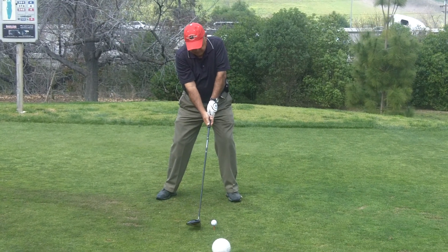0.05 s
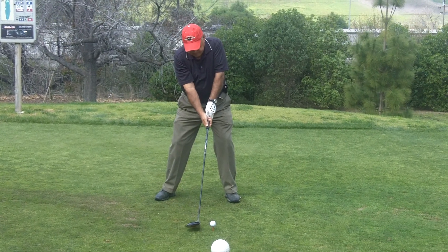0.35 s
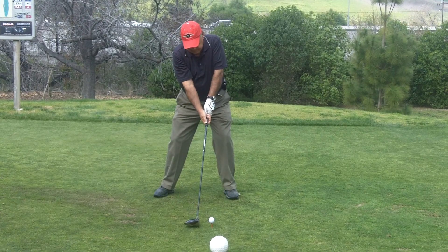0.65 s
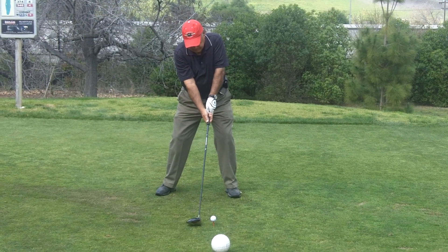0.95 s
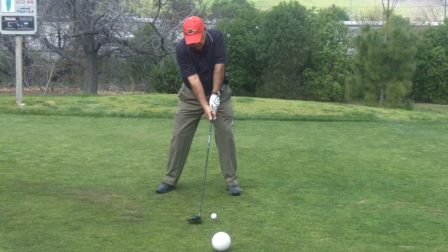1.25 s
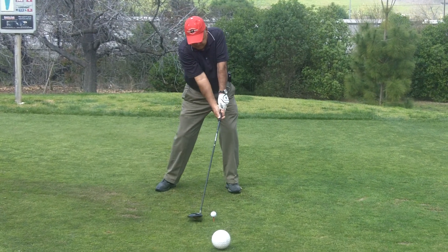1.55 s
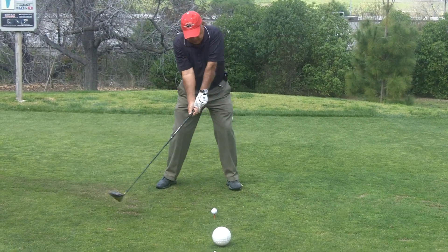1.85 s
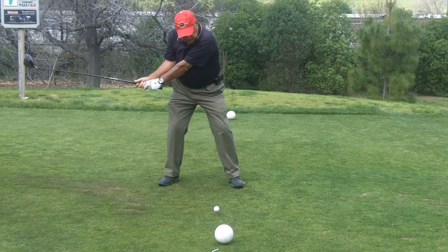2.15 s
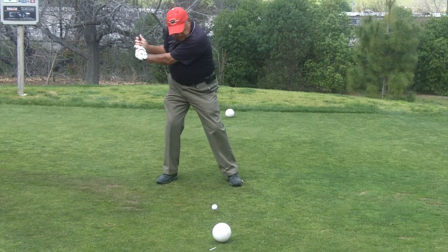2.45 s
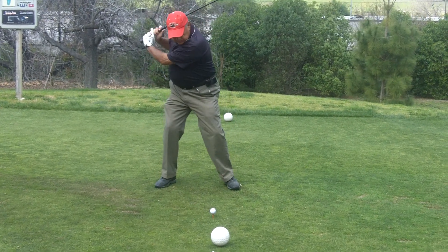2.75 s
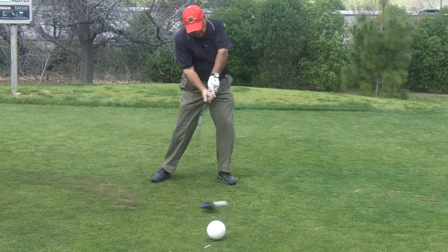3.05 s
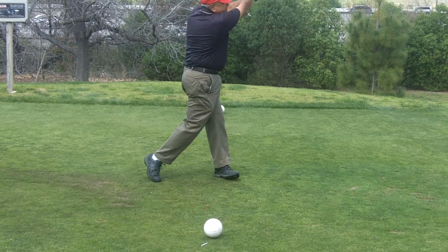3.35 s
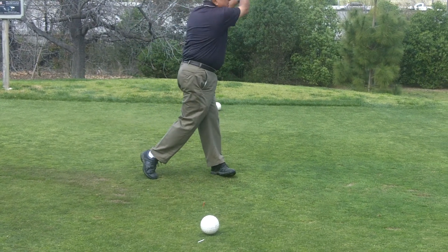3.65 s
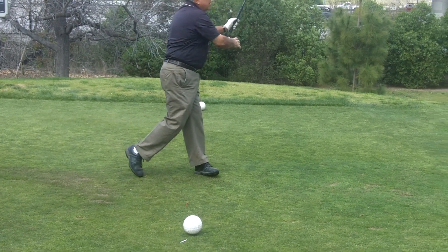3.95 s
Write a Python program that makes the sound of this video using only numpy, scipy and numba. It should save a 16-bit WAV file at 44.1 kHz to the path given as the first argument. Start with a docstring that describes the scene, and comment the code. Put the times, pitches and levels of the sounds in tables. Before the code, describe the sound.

A golf club hits a ball with a sharp metallic crack over distant traffic.

```python
"""A golf drive near a road. Engines and tyres hum throughout, under a faint hiss and whine.
A far-off hoot sounds at 1.2 s, then a small bird chirps twice. At 3.2 s the club swishes and cracks
against the ball; its hollow metal head rings, falling in pitch as it swings away. The crack overloads
the sound, so an automatic volume control turns everything down. The trees send the ring back,
and the background slowly returns."""
import sys
import numpy as np
from scipy import signal
from scipy.fft import rfft, irfft
from scipy.io import wavfile
from scipy.ndimage import uniform_filter1d
from numba import njit

SR = 44100
rng = np.random.default_rng(int(sys.argv[2]) if len(sys.argv) > 2 else 0)


def int16_out(signal):
    """Quantize to a 16-bit WAV file."""
    q = np.round(np.clip(np.atleast_2d(signal).T, -1, 1) * 32767)
    wavfile.write(sys.argv[1], SR, q.astype(np.int16))


N = 176400

# Tone colour of five noises: how strong each pitch is (frequency [Hz], relative level [dB])
HISS_COLOUR = [(3000, -5.5), (4000, -5), (5000, -3.5), (6100, 2), (7200, -7), (8300, -16), (9300, -23.5),
               (11000, -32), (12800, -34), (14500, -50)]
RUMBLE_COLOUR = [(12, -4), (22, 1.5), (40, -2), (53, -6), (72, -4.5), (100, -8), (145, -13), (200, -16),
                 (260, -22.5), (320, -24), (400, -32)]
TYRE_COLOUR = [(240, -45), (400, -13.5), (465, -6), (600, 0), (1030, -1), (1840, -7), (2860, -19.5),
               (3800, -34.5), (4940, -65), (8360, -120)]
RASP_COLOUR = [(4500, 1), (5500, 1), (8200, -1), (10000, -19), (12800, -20), (14000, -30)]
CRACK_COLOUR = [(200, -21), (600, -2), (1500, -3), (2500, -9), (4700, -15), (6400, 5), (7600, -5.5),
                (9500, -8), (13000, -20), (16000, -27)]
# Flow of the traffic (time [s], tyre level change [dB], engine level [dB])
TRAFFIC_FLOW = [(0, -0.3, -33.5), (.4, -0.8, -33.5), (.8, 0.7, -32.5), (1.25, 1.26, -29),
                (1.7, 0.94, -28.5), (2.1, 0, -27.5), (2.5, 1.2, -28.5), (2.9, 1.4, -27), (3.2, -0.2, -25),
                (3.6, -2.5, -25), (4, 0.8, -26)]
# The two chirps (start [s], full length [s], base level [dB], pitch [ratio],
# upper voice's level change over the length [dB], part sung [0-1], rasp time [s], relative rasp [dB])
CHIRPS = [(1.554, .104, -40, 1, 2, 1, 1.556, -13), (1.722, .106, -42, .985, -14, .86, 1.736, -9)]
# Course of one chirp (progress [0-1], pitch [Hz], level change [dB], roughness [0-1], lower voice [dB])
CHIRP_SHAPE = [(0, 5000, -2, 1, -25), (.13, 6080, 3, 0.54, -22), (.36, 7700, 0, .25, -8),
               (.6, 8420, -3, .22, -2.5), (.77, 8330, -1.5, .3, -2.5), (.87, 6950, -2, .55, -20),
               (1, 6250, -7, .5, -25)]
# Pitches that ring in the echo from the trees (delay [s], rise time [s], level [dB], pitch [Hz])
ECHO_RINGS = [(.155, .034, -38.5, 6220), (.115, .024, -47, 7950), (.13, .036, -57, 9150)]
# Dull knock of the ball (pitch [Hz], level [dB], time to fade by 60 dB [s])
BALL_TONES = [(640, -2, .016), (1000, -3, .01), (1320, -1, .01)]
# Natural tones of the club head; the close pair near 5800 Hz makes a quick wobble
# (pitch [Hz], relative level [dB], time to fade by 60 dB [s])
HEAD_TONES = [(3200, -14, .075), (4040, -20, .03), (5270, -14, .035), (5760, -5, .09), (5850, -1.5, .085),
              (6250, 1, .02), (6480, 1, .036), (6780, 1, .018), (7280, -12, .045), (7800, -14, .045),
              (8950, -14, .045), (9620, -3.5, .02), (11200, -14, .026), (12050, -13, .018)]

STRIKE_S = 3.2398  # the moment the club meets the ball


def gain(db):
    """Turn decibels into a number to multiply by."""
    return 10 ** (np.asarray(db) / 20)


def unit_level(x):
    """Scale a signal so that its average strength (rms) is 1."""
    return x / np.sqrt(np.mean(x ** 2))


def noise(colour, edge_db=40):
    """Noise with a given tone colour, falling by edge_db per octave beyond its ends."""
    hz, db = np.array(colour, float).T
    octave = np.log2(np.maximum(np.fft.rfftfreq(N, 1 / SR), 1))
    points = np.log2(hz)
    outside = abs(octave - np.clip(octave, points[0], points[-1]))
    shape = gain(np.interp(octave, points, db) - edge_db * outside)
    return unit_level(irfft(rfft(rng.standard_normal(N)) * shape, N))


def wobble(rate):
    """A smooth random curve of typical size 1 that changes about rate times a second."""
    hold = max(int(SR / rate), 1)
    steps = rng.standard_normal(N)[np.arange(N) // hold]
    return unit_level(uniform_filter1d(uniform_filter1d(steps, hold), hold))


def sine(hz):
    """A tone that follows a pitch curve."""
    return np.sin(2 * np.pi * np.cumsum(hz) / SR)


def fade(t, seconds):
    """Die away by 60 dB in the given time."""
    return np.exp(-np.log(1000) * t / seconds)


def ring(t, tones):
    """A struck object vibrates at several pitches, each fading at its own speed."""
    return sum(gain(db) * fade(t, seconds) * np.sin(2 * np.pi * hz * t) for hz, db, seconds in tones)


def scatter(x, strength):
    """Many tiny echoes that follow a strength curve, keeping about the same energy."""
    echoes = rng.standard_normal(N) * strength
    return signal.fftconvolve(x, echoes / np.sqrt(np.sum(echoes ** 2)))[:N]


def delay(x, seconds):
    """Start a sound later."""
    return np.concatenate([np.zeros(int(seconds * SR)), x])[:N]


def hiss_and_whine(t):
    """A steady hiss and a very faint, high tone."""
    return gain(-47.5) * noise(HISS_COLOUR) + gain(-88.5) * np.sin(2 * np.pi * 12780 * t)


def road(t):
    """Distant traffic: a low rumble, the wash of tyres, two engine notes and one brief hoot."""
    when, tyre_db, engine_db = np.array(TRAFFIC_FLOW).T
    rumble = noise(RUMBLE_COLOUR) * gain(-22.7 + .92 * wobble(5))
    tyres = noise(TYRE_COLOUR) * gain(-27 + np.interp(t, when, tyre_db) + .51 * wobble(11.87))
    drone_db = np.interp(t, when, engine_db)
    engines = sum(sine(hz + 3 * wobble(20)) * gain(drone_db + db + 2.4 * wobble(9))
                  for hz, db in [(70.46, 0), (172.1, -12)])
    hoot_swell = np.exp(-((t - 1.245) / .037) ** 2)
    hoot = sine(604 * (1 + .0212 * wobble(79.7))) * gain(-24.5) * hoot_swell
    return rumble + tyres + engines + hoot


def bird(t):
    """Two rough, two-voiced chirps echo in the bushes: one rises and falls, one breaks off early."""
    points, pitch, shape_db, roughness, lower_db = np.array(CHIRP_SHAPE).T
    song = np.zeros(N)
    for start, length, db, ratio, slope_db, sung, rasp_s, rasp_db in CHIRPS:
        progress = np.clip((t - start) / length, 0, 1)
        hz = ratio * np.interp(progress, points, pitch)
        upper = sine(hz * (1 + .06 * np.interp(progress, points, roughness) * wobble(1500)))
        lower = sine(hz * .44 * (1 + .07 * wobble(3500))) * gain(np.interp(progress, points, lower_db))
        upper *= 1 + 2 * gain(-17) * lower  # the lower voice shakes the upper, adding side tones
        voices = lower + upper * gain(slope_db * (progress - .5))
        on_off = np.clip(20 * np.minimum(progress, sung - progress), 0, 1)
        song += voices * gain(db + np.interp(progress, points, shape_db) + 3 * wobble(700)) * on_off
        raspy_start = np.exp(-((t - rasp_s) / .012) ** 2)
        song += noise(RASP_COLOUR) * gain(db + rasp_db) * raspy_start
    return song + gain(-11) * scatter(song, fade(t, seconds=.2))


def tree_echo(t, crack):
    """Leaves return the crack's treble as a wash, in which a few smeared ringing pitches stand out."""
    bright = signal.sosfilt(signal.butter(2, [5700, 9600], "band", fs=SR, output="sos"), crack)
    echo = gain(-33) * delay(scatter(bright, t * np.exp(-t / .04)), seconds=.104)
    smear = .011  # share of the pitch, to either side
    for late, rise, db, hz in ECHO_RINGS:
        tone = noise([(hz * (1 - smear), 0), (hz * (1 + smear), 0)], edge_db=400)
        echo += gain(db) * delay(tone * t / rise * np.exp(1 - t / rise), late)
    return echo


def turf_echo(t, crack):
    """The ground nearby scatters the crack and swallows its highest pitches."""
    dull = signal.sosfilt(signal.butter(2, 11000, fs=SR, output="sos"), crack)
    return gain(-8) * scatter(dull, fade(t, seconds=.085))


def swish(t):
    """Air torn by the club, loudest at the moment of the strike."""
    return noise(CRACK_COLOUR) * gain(-46) * np.exp(-abs(t - STRIKE_S) / .016)


def head_ring(t):
    """The hollow metal head rings, and its pitch drops as it swings away (the Doppler effect)."""
    drop_share, drop_s = .056, .042
    pitch_ratio = 1 - drop_share * (1 - np.exp(-t / drop_s))
    slowed_time = np.cumsum(pitch_ratio) / SR
    return gain(4) * ring(slowed_time, HEAD_TONES)


def golf_drive(t):
    """The club swishes in and hits: contact cracks, the ball knocks, the head rings, echoes follow."""
    crack = gain(10.5) * noise(CRACK_COLOUR) * fade(t, seconds=.0085)
    knock = ring(t, BALL_TONES)
    thin_ring = ring(t, [(8200, -20, .135)])  # steady in pitch, perhaps from the tee
    turf = turf_echo(t, crack)
    air = swish(t)
    ringing = (head_ring(t) + thin_ring) * gain(3.2 * wobble(300))  # the level flickers
    return air + delay(crack + knock + ringing + turf + tree_echo(t, crack), STRIKE_S)


def scene():
    """Mix all the sounds and place them in the middle, between left and right."""
    t = np.arange(N) / SR
    mono = golf_drive(t) + bird(t) + road(t) + hiss_and_whine(t)
    return mono * gain([[-.015], [.015]])


@njit
def volume_cut(excess_db, attack_s, release_db_per_s):
    """Decibels to turn down: the cut grows quickly when the sound is too loud, then shrinks steadily."""
    attack, release = 1 - np.exp(-1 / (attack_s * SR)), release_db_per_s / SR
    cuts, cut = np.empty(len(excess_db)), 0.
    for i, excess in enumerate(excess_db):
        cut = cut + (excess - cut) * attack if excess > cut else max(cut - release, 0.)
        cuts[i] = cut
    return cuts


def record(dry):
    """Turn down loud moments, round off the peaks, trim the treble and shift each side off zero."""
    limit_db, ceiling = -9, .77
    notch_hz, notch_width_hz, top_hz = 4235, 1320, 15500
    excess_db = 20 * np.log10(abs(dry).max(axis=0) + 1e-9) - limit_db
    cut_db = volume_cut(excess_db, attack_s=.00095, release_db_per_s=30.5)
    lowered = dry * gain(-delay(cut_db, seconds=.0005))  # reacts late, so the crack's start gets through
    fine = signal.resample_poly(lowered, 2, 1, axis=1)  # twice the samples, for a cleaner overload
    rounded = signal.resample_poly(ceiling * np.tanh(fine / ceiling), 1, 2, axis=1)
    notched = signal.lfilter(*signal.iirnotch(notch_hz, notch_hz / notch_width_hz, fs=SR), rounded)
    trimmed = signal.sosfilt(signal.ellip(8, .2, 70, top_hz, fs=SR, output="sos"), notched)
    return trimmed + np.array([[.018], [.036]])


dry = scene()
out = record(dry)
int16_out(out)
```